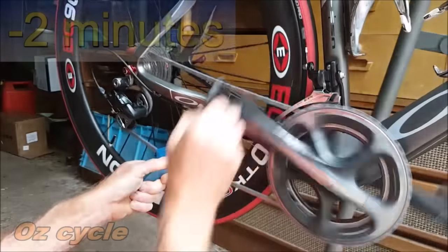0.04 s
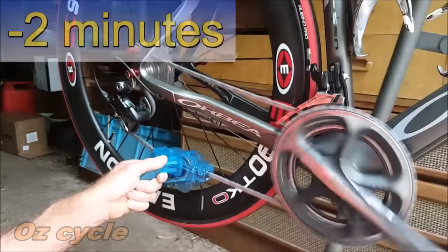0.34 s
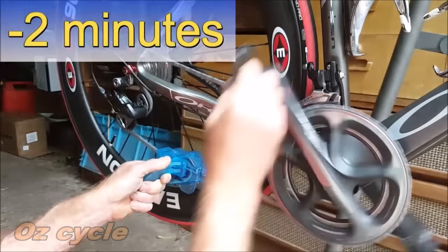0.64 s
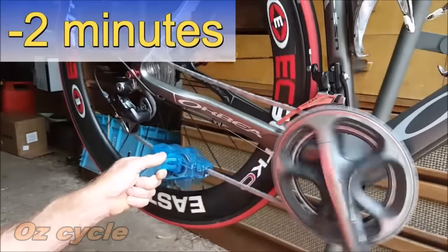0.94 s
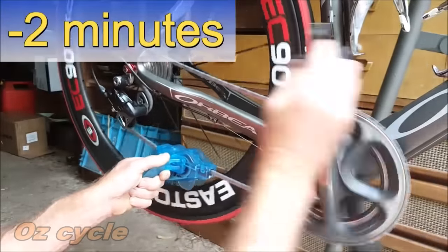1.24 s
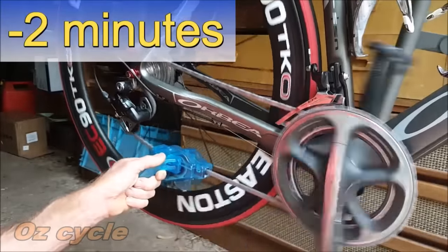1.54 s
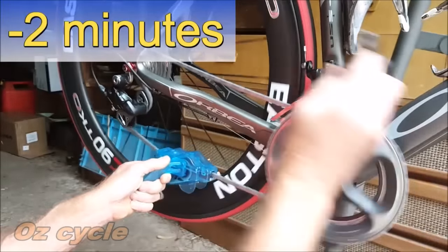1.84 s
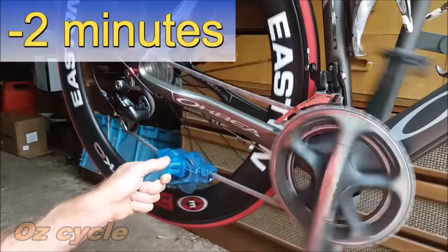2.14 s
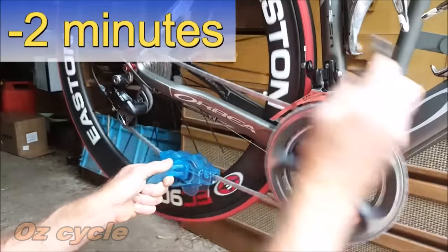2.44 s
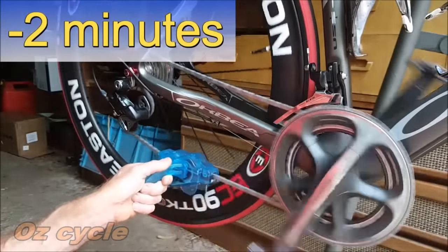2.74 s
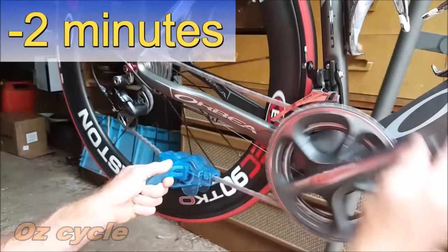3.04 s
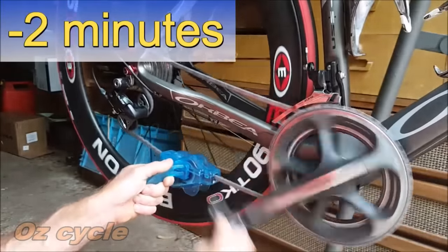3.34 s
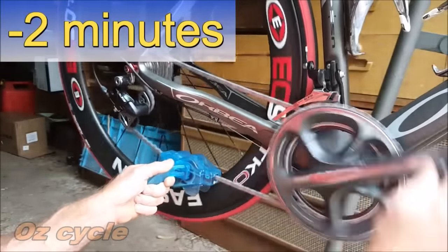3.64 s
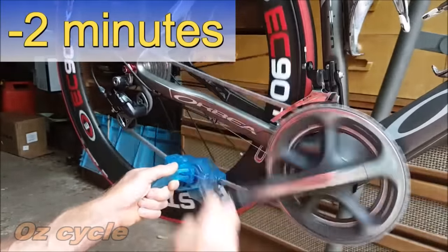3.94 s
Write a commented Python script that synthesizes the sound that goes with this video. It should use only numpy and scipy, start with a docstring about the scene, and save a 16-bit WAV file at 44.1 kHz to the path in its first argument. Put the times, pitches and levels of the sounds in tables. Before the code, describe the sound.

A bicycle chain runs through a plastic chain cleaner in a garage, clattering rapidly and surging with each crank push over the fizz of wet brushes. Slack chain jangles and the microphone is softly bumped at first; brief squishes follow.

```python
"""A bicycle chain is cranked backwards through a hand-held plastic chain cleaner in a garage. Links knock on
the housing throughout, faster and harder on each push of the crank, and wake the hollow fluid bath; loose
rollers rattle between knocks, wet brushes fizz and bubbles ping. At the start a brighter clatter also sounds
and the microphone is softly bumped. Now and then a link snags, and after the first second the brushes squish as
they pick up more fluid."""
import sys
import numpy as np
from scipy import signal
from scipy.fft import rfft, irfft
from scipy.io import wavfile
from scipy.ndimage import uniform_filter1d

SR = 44100
rng = np.random.default_rng(int(sys.argv[2]) if len(sys.argv) > 2 else 0)


def master(y):
    """Save y as 16-bit WAV."""
    cut = np.clip(np.atleast_2d(y).T, -1, 1)
    pcm = np.round(cut * 32767)  # scale
    wavfile.write(sys.argv[1], SR, pcm.astype(np.int16))


N = 176400
TIME = np.arange(N) / SR
HZ = np.fft.rfftfreq(N, 1 / SR)

# Levels and gains in the tables are relative, each within its own layer.
# spectrum of the garage's background noise: frequency_hz, gain_db
AIR_SPECTRUM = [(20, -4.5), (50, -8.5), (100, -4.5), (160, 3), (220, 0), (290, 1.5), (420, -1), (700, 0),
                (1200, -15), (4000, -12.5)]
# left-right coherence of that noise: frequency_hz, correlation
AIR_COHERENCE = [(30, 0.49), (100, 0.74), (300, 0.85), (1000, 0.92)]
# soft bumps on the microphone: centre_s, half_width_s, level_db
MIC_BUMPS = [(.04, 0.026, -54), (.187, 0.01, -45), (.228, 0.0065, -50), (0.273, 0.015, -50)]
# reflections from the wheel and frame: delay_s, left_gain, right_gain
BIKE_ECHOES = [(.0012, 0.028, 0.15), (.003, -0.21, .5), (.0043, 0.056, 0.14), (.0096, 0.11, 0.16)]
# reverberation time of the garage: frequency_hz, t60_s
GARAGE_DECAY = [(200, 0.59), (1500, 0.49), (5000, 0.22), (15000, 0.034)]
# brushes squishing through fluid: centre_s, half_width_s, level_db, pitch_hz, half_width_octaves
SQUISHES = [(1.106, 0.022, -39.5, 4700, 0.19), (1.14, 0.022, -39, 5700, 0.11),
            (2.215, 0.027, -38, 4000, .2), (2.29, .05, -46, 6900, 0.58), (2.678, 0.034, -38.5, 4250, .35),
            (2.793, 0.012, -41, 5370, 0.1), (2.77, 0.036, -45, 8060, 0.28), (3.445, .05, -42.5, 5700, 0.15),
            (3.49, .03, -45, 8300, 0.35), (3.513, 0.044, -37.5, 3720, 0.19),
            (3.584, .006, -34.5, 4870, 0.23)]
# strength of the scrubbing: time_s, level_db
SCRUB_LEVEL = [(0.0, -42.0), (0.08, -43.5), (0.2, -40.5), (0.48, -39.5), (0.62, -42.0), (0.9, -40.5),
               (1.02, -40.5), (1.12, -41.0), (1.25, -40.5), (1.62, -40.3), (1.73, -41.8), (1.85, -40.5),
               (1.93, -42.3), (2.05, -41), (2.28, -39), (2.5, -40.7), (2.8, -39.3), (2.93, -41.3),
               (3.02, -39.8), (3.09, -41.5), (3.2, -39.5), (3.5, -38.7), (3.65, -40.2), (3.85, -39.5),
               (4.0, -40)]
# spectrum of the scrubbing: frequency_hz, gain_db
SCRUB_SPECTRUM = [(300, -50), (1000, -16), (2200, -11), (3100, -8.5), (3700, -1), (4900, -3), (6200, -2),
                  (7700, -6.5), (9500, -8.5), (11700, -12.5), (13100, -11), (14500, -12), (15150, -10),
                  (15600, 1), (16000, -27)]
# faint resonances of the steel links: pitch_hz, width_hz, boost_db
STEEL_PEAKS = [(3670, 130, 2.5), (4450, 120, 3.5), (6030, 190, 1.5), (8270, 190, 3), (9360, 150, 4),
               (13100, 260, 5.5), (14100, 140, 2.5)]
# level of a brighter clatter at the start: time_s, level_db
OPENING_CLATTER_LEVEL = [(0, -44), (.12, -47.5), (.2, -42), (.28, -44.5), (.335, -40.5), (.4, -46), (.55, -52),
                         (.7, -71)]
# spectrum of that clatter: frequency_hz, gain_db
OPENING_CLATTER_SPECTRUM = [(400, -45), (1200, -14), (1400, -8), (1800, -1), (2200, -17), (2680, -1), (3100, -9.5),
                            (5000, -16), (6300, -49), (7200, -23), (15000, -51)]
# spectrum of the loose rollers: frequency_hz, gain_db
ROLLER_SPECTRUM = [(300, -34.5), (1150, -19), (1380, -10), (1550, -7), (1730, -5), (2050, -13.5),
                   (2400, -16.5), (2680, -8.5), (3100, -12.5), (6000, -49.5)]
# links catching in the cleaner: start_s, level_db
LINK_SNAGS = [(0.330, -7), (0.384, -16), (.906, -15), (2.130, -8), (2.735, -16), (3.904, -11.5)]
# excitation of the fluid bath, swelling with each push of the crank: time_s, level_db
BATH_LEVEL = [(0, -37), (.18, -35), (.37, -45), (.6, -44), (.75, -27.5), (.84, -34), (.9, -25), (1.08, -40),
              (1.26, -37), (1.37, -25), (1.45, -22.5), (1.54, -27), (1.7, -44), (1.92, -39), (2.02, -25),
              (2.1, -23), (2.25, -36), (2.55, -37), (2.64, -23), (2.75, -23.5), (2.91, -42), (3.1, -32),
              (3.16, -38), (3.41, -24), (3.58, -36), (3.82, -37), (3.92, -26), (4, -28)]
# hollow response of the bath: frequency_hz, gain_db
BATH_SPECTRUM = [(120, -24.5), (290, -6), (420, -17.5), (500, 4), (565, 5), (640, -6), (760, -1),
                 (1000, -17.5), (1500, -25)]
# modes of the bath: pitch_hz, level_db, t60_s
FLUID_MODES = [(490, -27, .075), (560, -26, .085)]
# response of the plastic housing: frequency_hz, gain_db
HOUSING_SPECTRUM = [(300, -35.5), (800, -10), (1180, -8.5), (1350, 3.5), (1480, 9), (1620, -2.5),
                    (1850, 11), (2130, -4), (2370, -4.5), (2650, 5.5), (3050, -11), (3680, -1.5),
                    (4500, -11), (8000, -29), (15000, -15)]
# modes that ring on after a knock: pitch_hz, level_db, t60_s
HOUSING_MODES = [(1420, -33.5, .06), (1660, -33.5, .06), (1810, -32.5, .06), (2680, -34.5, .05),
                 (3690, -35, .06)]
# chain speed, surging twice per crank turn: time_s, links_per_s
CHAIN_SPEED = [(0.0, 35.06), (0.38, 37.15), (0.435, 27.57), (0.684, 25.25), (0.857, 35.68), (1.032, 30.77),
               (1.246, 22.2), (1.425, 38.19), (1.541, 29.91), (1.628, 35.22), (1.899, 22.47),
               (2.011, 33.35), (2.284, 35.9), (2.512, 22.38), (2.623, 34.19), (2.748, 34.97),
               (2.927, 25.53), (3.125, 25.17), (3.273, 31.74), (3.513, 39.4), (3.66, 24.12), (3.923, 31.17),
               (4.0, 35.19)]
# force of the chain on the housing: time_s, level_db
CHAIN_FORCE = [(0.0, -48), (0.1, -48), (0.33, -43), (0.43, -45.5), (0.57, -42.5), (0.7, -37), (0.85, -38),
               (0.93, -35.5), (1.13, -40), (1.28, -39), (1.43, -34), (1.55, -37.5), (1.7, -37.5),
               (1.91, -40.5), (2.1, -34), (2.17, -42.5), (2.2, -35), (2.27, -35), (2.38, -38),
               (2.55, -39.5), (2.63, -36), (2.74, -34), (2.82, -37.5), (2.92, -41.5), (3.02, -38),
               (3.15, -39.5), (3.33, -36), (3.47, -35.5), (3.65, -38.5), (3.8, -40.5), (3.9, -36.5),
               (4.0, -42)]
# stiff links that strike harder and loose ones that slip past: time_s, gain_db
LINK_ACCENTS = [(.455, 4), (.49, -4), (.72, -1.5), (1.03, 1.5), (1.17, 3), (1.255, 1.3), (1.295, 2.5),
                (1.36, -2), (1.391, 2), (1.447, 2.5), (1.478, -3), (1.865, 2.5), (1.908, -4), (2.16, -7),
                (2.618, 2), (2.97, 2.5), (3.126, -2), (3.33, 1.3), (3.36, -2.5), (3.417, 2.5)]

USUAL_LINKS_PER_S, BAND_LIMIT_HZ = 31, 15760
BRUSH_PAN_DB, FLICKER_DB, SPRAY_WET_DB = 1.3, 1.95, 0.5
HOUSING_PAN_DB, HOUSING_WET_DB = 1.95, -9


def amp(db):
    """Amplitude ratio of a level in decibels."""
    return 10 ** (np.asarray(db) / 20)


def unit(x):
    """Normalisation to an rms of one."""
    return x / np.sqrt(np.mean(x ** 2) + 1e-20)


def curve(points, t=TIME):
    """Linear interpolation in time."""
    return np.interp(t, *np.transpose(points))


def at_hz(points, hz):
    """Interpolation on a logarithmic frequency axis."""
    f, value = np.transpose(points)
    return np.interp(np.log(hz + 1), np.log(f), value)


def add(mix, start_s, sound):
    """Superposition of a sound on the mix."""
    part = mix[max(round(start_s * SR), 0):][:len(sound)]
    part += sound[:len(part)]


def pan(db):
    """Left and right gains for an interchannel level difference."""
    return amp(np.array([[db], [-db]]) / 2)


def from_left(x):
    """Path difference: the housing's sound is louder and one sample earlier on the left."""
    return pan(HOUSING_PAN_DB) * np.array([x[0], np.pad(x[1], (1, 0))[:N]])


def wander(rate_hz):
    """Random modulation: low-passed noise of unit rms."""
    return unit(irfft(rfft(rng.standard_normal(N)) / (1 + (HZ / rate_hz) ** 4), N))


def patches(shape, bins, frames):
    """Random modulation correlated over neighbouring frequencies and times."""
    across_hz = uniform_filter1d(rng.standard_normal(shape), bins, axis=0)
    return unit(uniform_filter1d(across_hz, frames, axis=1))


def links_passed():
    """Chain travel in links, the integral of its speed."""
    return np.cumsum(curve(CHAIN_SPEED)) / SR


def clicks(usual_per_s, scatter_db):
    """A Poisson train of uneven impulses, its rate proportional to chain speed."""
    fires = rng.random(N) < usual_per_s / SR * curve(CHAIN_SPEED) / USUAL_LINKS_PER_S
    strength = amp(scatter_db * np.minimum(rng.exponential(1, N), 4))
    return rng.choice([-1, 1], N) * strength * fires


def impulse_response(spectrum, dispersion_s=.0006, fastest_hz=5000, size=2048):
    """Dispersion in a struck body: low bending waves arrive later than high ones."""
    hz = np.fft.fftfreq(size, 1 / SR)
    log_gain = np.log(amp(at_hz(spectrum, abs(hz))))
    minimum_phase = np.exp(np.conj(signal.hilbert(log_gain)))
    low_hz = np.minimum(abs(hz), fastest_hz)
    lag_cycles = np.sign(hz) * dispersion_s * (2 * np.sqrt(low_hz * fastest_hz) - low_hz)
    blow = np.fft.ifft(minimum_phase * np.exp(-2j * np.pi * lag_cycles)).real[:size // 2]
    return blow / np.linalg.norm(blow)


def ringing(modes, rise_s=.002, detune=.022):
    """Damped free vibration: modes swell and decay, detuned at each blow as the fluid sloshes."""
    t = np.arange(3072) / SR
    hz, db, t60 = np.transpose(modes)[:, :, None]
    cycles = hz * (1 + detune * rng.standard_normal(hz.shape)) * t + rng.random(hz.shape)
    partials = amp(db - 60 * t / t60) * np.sin(2 * np.pi * cycles)
    return np.minimum(t / rise_s, 1) * partials.sum(0)


def garage(x, wet_db, rise_s=.0014):
    """Room response in stereo: direct sound, early reflections and an exponential diffuse tail."""
    hz, t, noise = signal.stft(rng.standard_normal((2, SR // 2)), SR, nperseg=256)
    decay = amp(-60 * t / at_hz(GARAGE_DECAY, hz)[:, None])
    tail = signal.istft(noise * decay, SR, nperseg=256)[1]
    tail *= np.minimum(np.arange(tail.shape[1]) / SR / rise_s, 1)
    response = amp(wet_db) * tail / np.linalg.norm(tail[0])
    response[:, 0] += 1
    for delay_s, left, right in BIKE_ECHOES:
        response[:, round(delay_s * SR)] += [left, right]
    return signal.fftconvolve(x[None], response, axes=1)[:, :N]


def background(level_db=-56.5):
    """Partly coherent noise: the low, steady sound of the garage."""
    left, independent = rfft(rng.standard_normal((2, N)))
    coherence = at_hz(AIR_COHERENCE, HZ)
    right = coherence * left + np.sqrt(1 - coherence ** 2) * independent
    air = irfft(np.array([left, right]) * amp(at_hz(AIR_SPECTRUM, HZ)), N)
    return amp(level_db) * unit(air)


def bumps():
    """Each soft bump on the microphone is one slow pressure swing, the derivative of a Gaussian."""
    out = np.zeros(N)
    for centre_s, half_width_s, db in MIC_BUMPS:
        offset = (TIME - centre_s) / half_width_s
        out += amp(db) * 2 * offset * np.exp(-offset ** 2)
    return out


def bubbles(per_s=45, low_hz=3800, high_hz=10500, decay_cycles=70, rise_per_s=.8):
    """Bubbles in the churned fluid ping as damped oscillators, each rising from its own pitch."""
    t, out, count = np.arange(2400) / SR, np.zeros(N), round(per_s * N / SR)
    for (when, pitch), db in zip(rng.random((count, 2)), rng.normal(-49, 2.5, count)):
        hz = low_hz * (high_hz / low_hz) ** pitch
        cycles = hz * t * (1 + rise_per_s * t / 2)
        ping = np.sin(2 * np.pi * cycles) * np.exp(-t * hz / decay_cycles)
        add(out, when * N / SR, amp(db) * ping)
    return garage(out, SPRAY_WET_DB)


def squishes():
    """Bursts of band-limited noise sound as the brushes pick up more fluid."""
    spray = rfft(rng.standard_normal((2, N)) * amp(FLICKER_DB * wander(rate_hz=410)))
    out = np.zeros((2, N))
    for centre_s, half_width_s, db, hz, octaves in SQUISHES:
        band = 1 / (1 + (np.log2((HZ + 1) / hz) / octaves) ** 4)
        envelope = amp(db) * np.exp(-((TIME - centre_s) / half_width_s) ** 2)
        out += envelope * unit(irfft(spray * band, N))
    return pan(BRUSH_PAN_DB) * out


def bristles(usual_per_s=900, pitches=24, decay_cycles=1.8):
    """Bristles flick off the wet links in heavily damped oscillations of many pitches."""
    t, out = np.arange(256) / SR, np.zeros(N)
    for hz in np.geomspace(2500, 15000, pitches):
        flick = np.sin(2 * np.pi * hz * t) * np.exp(-t * hz / decay_cycles) * hz
        out += signal.oaconvolve(clicks(usual_per_s / pitches, scatter_db=2.8), flick)[:N]
    return unit(garage(out, SPRAY_WET_DB))


def brushes(gain_db=3.5, bristle_db=-12.5, patch_db=1.08, slosh_db=.5, beats_per_link=2.96, beat_db=1.9):
    """Friction noise of wet brushes, pulsing a few times per link and coloured by the steel's modes."""
    noise = signal.stft(rng.standard_normal((2, N)), SR, nperseg=256)[2]
    shift_db = patch_db * patches(noise.shape[1:], bins=9, frames=5)
    shift_db += slosh_db * patches(noise.shape[1:], bins=4, frames=22)
    hiss = signal.istft(noise * amp(shift_db), SR, nperseg=256)[1][:, :N]
    beat = np.cos(2 * np.pi * beats_per_link * links_passed() + .5 * wander(rate_hz=1.1))
    hiss = unit(hiss * amp(beat_db * beat + FLICKER_DB * wander(rate_hz=500)))
    steel_db = sum(db / (1 + (2 * (HZ - hz) / width) ** 2) for hz, width, db in STEEL_PEAKS)
    colour = amp(at_hz(SCRUB_SPECTRUM, HZ) + steel_db) * (HZ < BAND_LIMIT_HZ)
    fizz = irfft(rfft(hiss + amp(bristle_db) * bristles()) * colour, N)
    return pan(BRUSH_PAN_DB) * amp(curve(SCRUB_LEVEL) + gain_db) * unit(fizz)


def chatter(spectrum, envelope=1):
    """Shot noise: dense random impacts excite a resonant body in the garage."""
    taps = clicks(usual_per_s=800, scatter_db=4) * envelope
    vibration = signal.oaconvolve(taps, impulse_response(spectrum))[:N]
    return unit(garage(vibration, wet_db=-7))


def opening_clatter():
    """At the start, dense random impacts excite brighter resonances than the rollers do, fading out by 0.7 s."""
    return pan(HOUSING_PAN_DB) * amp(curve(OPENING_CLATTER_LEVEL)) * chatter(OPENING_CLATTER_SPECTRUM)


def roller_rattle(gain_db=-6, fade_db_per_link=3):
    """Loose rollers strike the housing in proportion to the chain's force, settling after each knock."""
    settling = amp(-fade_db_per_link * (links_passed() % 1))
    return from_left(amp(curve(CHAIN_FORCE) + gain_db) * chatter(ROLLER_SPECTRUM, settling))


def snags(length_s=.009):
    """A catching link drives the housing's resonances with a brief, fading random force."""
    out, blow = np.zeros(N), impulse_response(HOUSING_SPECTRUM)
    fade = np.linspace(1, 0, round(length_s * SR))
    for start_s, db in LINK_SNAGS:
        clatter = np.convolve(fade * rng.standard_normal(len(fade)), blow)
        add(out, start_s, amp(db) * clatter / np.linalg.norm(clatter))
    return from_left(garage(out, HOUSING_WET_DB))


def link_knocks(gain_db=25.3, scatter_db=.4, accent_reach_s=.012, rebound_s=.01, rebound_db=-17):
    """Impact excitation: each link knocks on the housing, rebounds and sounds the bath."""
    tails, bath = np.zeros((3, N)), np.zeros(N)
    blow = impulse_response(HOUSING_SPECTRUM)
    thud = impulse_response(BATH_SPECTRUM, dispersion_s=0)
    for start_s in np.flatnonzero(np.diff(np.floor(links_passed()))) / SR:
        accent_db = sum(db for at_s, db in LINK_ACCENTS if abs(at_s - start_s) < accent_reach_s)
        uneven_db = accent_db + scatter_db * rng.standard_normal()
        force = amp(curve(CHAIN_FORCE, start_s) + gain_db + uneven_db)
        feed = tails[rng.integers(3)]  # one of three random room tails, so repeats do not ring alike
        add(feed, start_s, force * blow)
        add(feed, start_s, force * ringing(HOUSING_MODES))
        for late, size in zip(rng.random(3), rng.standard_normal(3)):
            add(feed, start_s + late * rebound_s, size * amp(rebound_db) * force * blow)
        push = amp(curve(BATH_LEVEL, start_s) + uneven_db / 2)
        add(bath, start_s, push * thud)
        add(bath, start_s, push * ringing(FLUID_MODES))
    housing = sum(garage(feed, HOUSING_WET_DB) for feed in tails)
    return from_left(housing) + garage(bath, wet_db=-12)


def scene():
    """Superposition of the chain's impacts, the wet scrubbing and the background."""
    impacts = link_knocks() + snags() + roller_rattle() + opening_clatter()
    return impacts + brushes() + squishes() + background() + bumps() + bubbles()


def record(dry):
    """Band limiting by a steep linear-phase low-pass filter."""
    lowpass = signal.firwin(1023, BAND_LIMIT_HZ, window=("kaiser", 9), fs=SR)
    return signal.oaconvolve(dry, lowpass[None], "same")


dry = scene()
out = record(dry)
master(out)
```